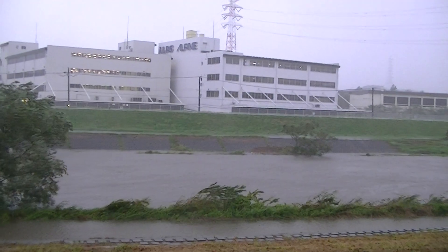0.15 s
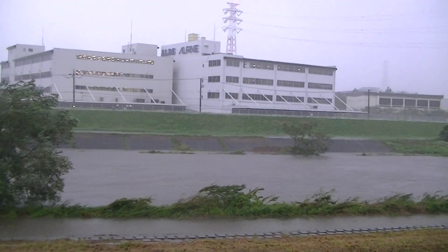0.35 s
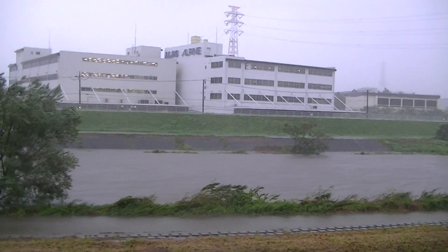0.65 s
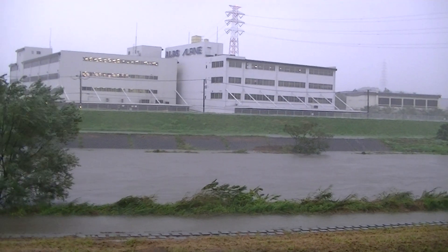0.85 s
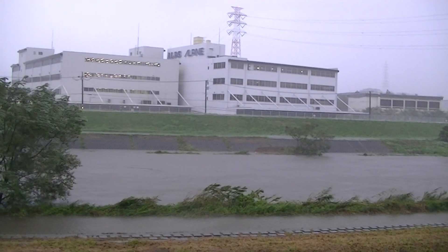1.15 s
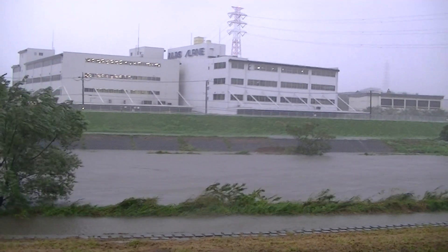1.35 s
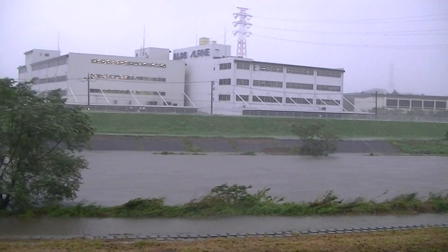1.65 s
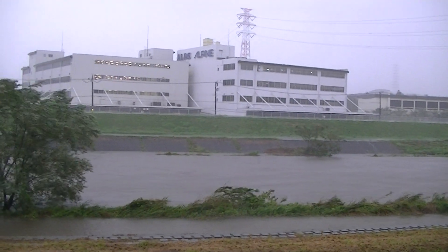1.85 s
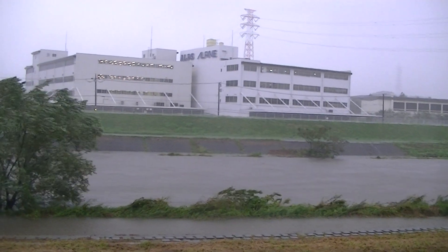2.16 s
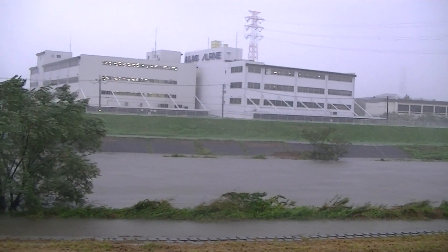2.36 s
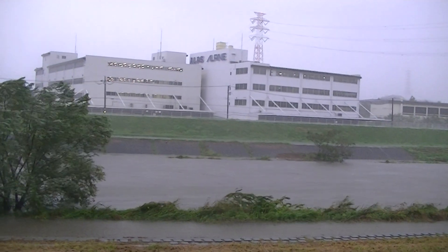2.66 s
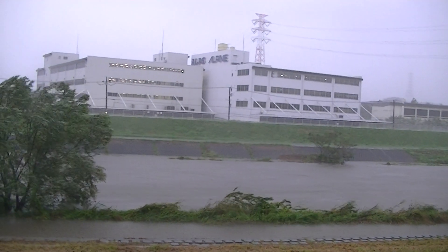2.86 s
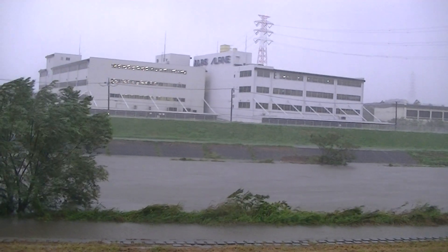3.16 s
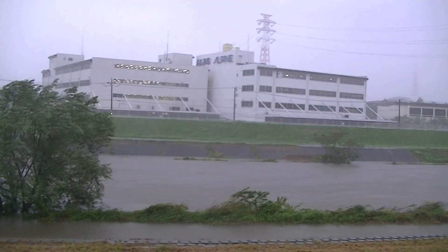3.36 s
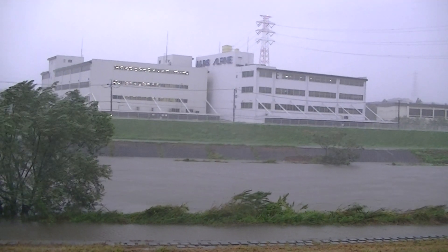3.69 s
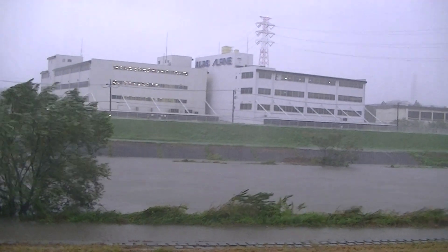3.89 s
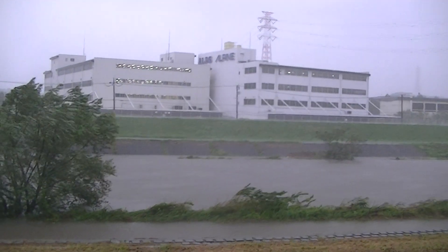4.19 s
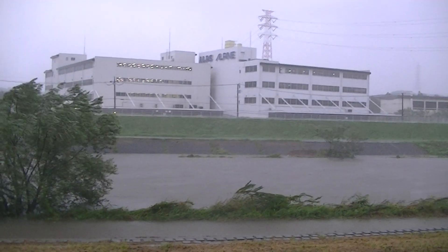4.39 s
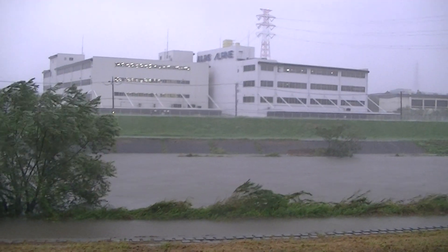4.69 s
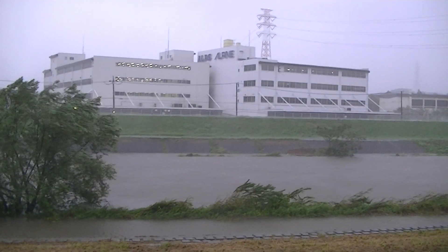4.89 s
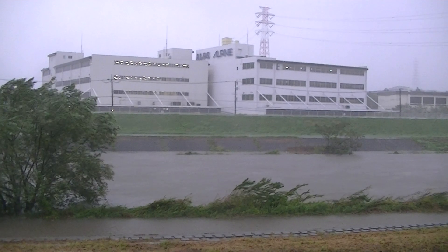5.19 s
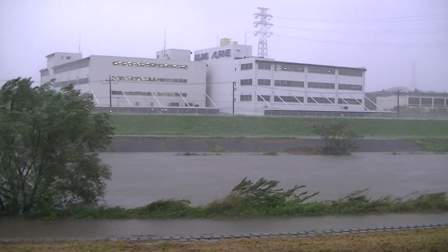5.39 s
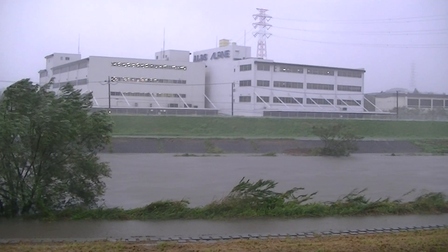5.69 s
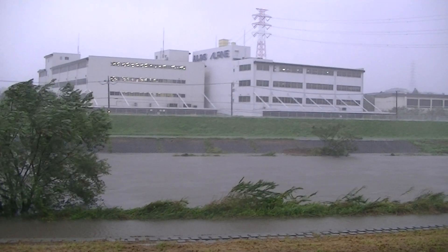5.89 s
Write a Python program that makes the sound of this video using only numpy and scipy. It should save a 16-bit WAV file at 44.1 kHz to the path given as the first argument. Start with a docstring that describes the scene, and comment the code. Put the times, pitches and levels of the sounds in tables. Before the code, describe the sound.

Heard from a parked car, heavy rain hisses and gusts roar through leaves while a wiper knocks dully and nearby drops crackle.

```python
"""Gusts rush through the trees in a storm on a swollen river bank, heard from a parked car.
The trees and the heavy rain are noise in bands that flicker; close spray is made of tiny ringing grains.
The wiper thuds at each turn: a random push sets panel and cabin air ringing. Near drops tick as noise bursts.
Eddies at the microphone ports pop as short rings, over a lumpy rumble of low noise.
The microphones cut the bass steeply, the left one a little more than the right."""
import sys
import numpy as np
from scipy import signal
from scipy.io import wavfile

SR = 44100
rng = np.random.default_rng(int(sys.argv[2]) if len(sys.argv) > 2 else 0)


def store_pcm(level_fs):
    """Save levels as 16-bit WAV."""
    pcm = np.round(np.clip(level_fs, -1, 1) * 32767).astype(np.int16)
    wavfile.write(sys.argv[1], SR, np.atleast_2d(pcm).T)


N = 266364   # length in samples


def from_db(db):
    """Turns decibels into a factor for the wave's height."""
    return 10 ** (np.asarray(db) / 20)


def rms_one(x):
    """Scales a sound to an average strength (rms) of 1."""
    return x / np.sqrt(np.mean(x ** 2) + 1e-20)


def in_time(rows):
    """Draws straight lines between the rows of a time table, giving each column a value per sample."""
    s, *columns = np.transpose(rows)
    return [np.interp(np.arange(N) / SR, s, column) for column in columns]


def at_hz(points, hz):
    """Reads a spectrum at a pitch, with straight lines between points on a log-frequency axis."""
    table_hz, table_db = np.transpose(points)
    return np.interp(np.log(hz), np.log(table_hz), table_db)


def drift(rate_hz):
    """Slow random wandering of spread 1: noise smoothed by two equal one-pole low-pass filters."""
    step = 40   # samples between random values; straight lines fill the gaps
    r = np.exp(-2 * np.pi * rate_hz * step / SR)
    noise = rng.standard_normal(N // step + 2002)
    slow = signal.lfilter([1], [1, -2 * r, r * r], noise)[2000:]   # skip the filter's start
    return np.interp(np.arange(N) / step, np.arange(len(slow)), rms_one(slow))


def ring(clicks, hz, t60_s):
    """A resonance: each click starts a sine wave that fades by 60 dB in t60_s."""
    r = from_db(-60 / (t60_s * SR))
    w = 2 * np.pi * hz / SR
    return signal.lfilter([0, np.sin(w)], [1, -2 * r * np.cos(w), r * r], clicks + 1e-18)


def add(out, s, db, shape):
    """Adds a short sound at time s, scaled so that its peak has the given level."""
    i = round(s * SR)
    out[i:i + len(shape)] += from_db(db) * shape[:N - i] / np.abs(shape).max()


def banded_noise(spectrum, tilt_db, shared_db, own_db, flutter_hz):
    """Third-octave bands of stereo noise flicker partly together and partly alone."""
    # how wide the stereo is, side against middle: f/Hz, level/dB
    stereo_spread = [(60, -5), (150, -21), (400, -16), (1000, -21.5), (2400, -16), (4500, -15.5),
                     (8000, -21.5), (15000, -35)]
    out = 0
    together = drift(flutter_hz)
    edges = 70 * 2 ** (np.arange(25) / 3)
    white = rng.standard_normal((2, 2, N))   # neighbouring bands get unrelated noise
    for k, (low, high) in enumerate(zip(edges, edges[1:])):
        band = signal.butter(2, [low, high], "band", fs=SR, output="sos")
        mid, side = signal.sosfilt(band, white[k % 2])
        hz = np.sqrt(low * high)
        tilt = tilt_db * np.log2(hz / 1200)   # tilt_db is per octave
        flicker = shared_db * together + own_db * drift(16.0)
        gain = from_db(at_hz(spectrum, hz) + tilt + flicker)
        side = from_db(at_hz(stereo_spread, hz)) * side
        out = out + gain * (mid + side * [[1], [-1]])
    return rms_one(out)


def wind():
    """Gusts rise and fall along straight dB slopes and add power; brightness is averaged by power."""
    # steady wind in the trees: t/s, level/dB
    steady_wind = [(0, -35), (.3, -35.5), (1.1, -33), (1.4, -35), (2.2, -33), (2.5, -35), (4.7, -36),
                   (5.47, -36.5), (5.72, -32.5), (6.04, -34.5)]
    # gusts on top: peak t/s, peak level/dB, rise/(dB per s), fall/(dB per s), brightness/(dB per octave)
    gusts = [(1.87, -35, 25, 80, -.8), (2.6, -28, 150, 35, .9), (2.725, -24.3, 75, 65, 2.6),
             (2.84, -27.5, 150, 55, 1.8), (3.06, -29, 200, 40, 1), (3.125, -27, 70, 65, .2),
             (3.6, -25.3, 20, 60, 1.0), (3.98, -28, 15, 28, .8), (4.27, -29.5, 300, 25, 1.2),
             (4.4, -31, 30, 45, .6), (4.812, -30.5, 400, 50, 1.3), (4.88, -36, 100, 40, 2.5),
             (5.065, -31, 120, 30, .7)]
    steady_bright_db = 0.05   # dB per octave
    dulling = 4.5   # brightness lost after the peak, dB per octave each second
    power = from_db(2 * in_time(steady_wind)[0])   # doubled dB: power instead of height
    bright = steady_bright_db * power
    for s, db, rise_db, fall_db, bright_db in gusts:
        after = np.arange(N) / SR - s
        gust = from_db(2 * (db + np.minimum(rise_db * after, -fall_db * after)))
        power = power + gust
        bright = bright + gust * (bright_db - dulling * np.maximum(after, 0))
    return 10 * np.log10(power), bright / power


def trees():
    """Leaves and branches rush: banded noise takes its level and brightness from the wind."""
    # sound of the rush, strength per Hz: f/Hz, level/dB
    rush_spectrum = [(40, -1), (120, -18), (300, -2.5), (600, 2), (1000, 0.5), (1800, -2), (3000, -8),
                     (4500, -11), (7000, -24), (11000, -30.5), (16000, -42)]
    rush_db, bright_db = wind()
    rush = banded_noise(rush_spectrum, bright_db, shared_db=0.67, own_db=1.03, flutter_hz=39.0)
    return from_db(rush_db + 2) * rush


def rain():
    """Far drops merge into hiss; near spray stays grainy, each grain ringing a few cycles."""
    # strength of the rain: t/s, hiss level/dB, spray grains/(per s, before clumping)
    rain_strength = [(0, -40.5, 280), (.9, -37.5, 190), (2.5, -40.5, 260), (2.72, -43, 300),
                     (3.2, -42.5, 300), (4.2, -37, 390), (4.5, -37.5, 540), (5.1, -39, 280),
                     (6.04, -38.5, 450)]
    # sound of the hiss, strength per Hz: f/Hz, level/dB
    hiss_spectrum = [(100, 3), (800, 1), (2000, -0.5), (4000, -4.5), (6000, -5.5), (9000, -6.5),
                     (12000, -13), (14000, -5.5), (16000, -17)]
    hiss_db, grains_per_s = in_time(rain_strength)
    hiss = banded_noise(hiss_spectrum, 0, shared_db=0.77, own_db=.5, flutter_hz=16.0)
    hiss = from_db(hiss_db) * hiss

    sizes = from_db(5.1 * np.minimum(rng.exponential(1, N), 4)) * rng.choice([-1, 1], N)
    clumping = from_db(3.5 * drift(25.0))
    born = rng.random(N) < grains_per_s * clumping / SR
    pitches_hz = np.geomspace(4000, 14500, 12)
    dealt = rng.integers(0, 12, N)   # which pitch a grain gets
    spray = sum(ring(sizes * born * (dealt == k), hz, 8.7 / hz) for k, hz in enumerate(pitches_hz))
    sway = from_db(0.45 * np.outer([1, -1], drift(40.0)))   # slightly left, slightly right
    return hiss + from_db(-44.5) * spray * sway


def rumble():
    """Eddies make a lumpy low rumble that follows the gusts, with its own lumps at each port."""
    lumps_db = 7.2 * np.array([drift(20.0), drift(13.0)])
    level = from_db(wind()[0] - 39.5 + lumps_db)
    low_noise = signal.lfilter(*signal.butter(2, 250, fs=SR), rng.standard_normal((2, N)))
    return level * rms_one(low_noise)


def knock(modes, contact_s):
    """A rubbery contact shudders briefly; the resonances build up and die, in new shares each time."""
    push = np.zeros(SR // 3)
    length = round(contact_s * SR)
    push[:length] = np.hanning(length) * rng.standard_normal(length)
    # the second, shorter ring softens the start
    return sum(from_db(db) * rms_one(ring(ring(push, hz, t60_s), hz, 8 / hz)) for hz, db, t60_s in modes)


def thuds():
    """The turning wiper knocks the panel; the cabin air booms a little later."""
    # panel resonances: f/Hz, level/dB, time to fade by 60 dB/s
    panel_modes = [(425, 0, .12), (330, -8, .06), (545, -10, .06), (640, -12, .05)]
    # cabin air resonances: f/Hz, level/dB, time to fade by 60 dB/s
    cabin_modes = [(192, 0, .16), (165, -3, .24), (130, -4, .32)]
    # panel knock at each turn, top and bottom by turns: level/dB
    knock_levels = [-28, -30, -44, -36, -34, -36, -46, -28]
    # cabin boom at the top turn, then at the bottom turn: level/dB
    boom_levels = -56, -45
    first_turn_s, sweep_s, cycle_s = .392, .797, 1.396   # first top turn, top to bottom, top to top
    boom_lag_s = .01
    out = np.zeros(N)
    for k, panel_db in enumerate(knock_levels):
        cycle, bottom = divmod(k, 2)
        s = first_turn_s + cycle * cycle_s + bottom * sweep_s
        add(out, s, panel_db, np.diff(knock(panel_modes, .01)))   # differences thin the bass
        add(out, s + boom_lag_s, boom_levels[bottom], knock(cabin_modes, .015))
    return out


def pops():
    """An eddy pushes one microphone port for a cycle or two and the pressure leaks away."""
    # eddies: t/s, port (0 left, 1 right), peak level/dB, f/Hz
    eddies = [(1.538, 0, -39, 300), (1.545, 1, -38, 320), (3.024, 1, -36, 280), (4.220, 1, -38, 260),
              (4.765, 0, -28, 330), (4.770, 1, -23, 350), (4.782, 1, -30, 340), (4.817, 1, -39, 350),
              (5.0145, 1, -20, 850), (5.087, 1, -40, 190), (5.101, 1, -40, 200)]
    out = np.zeros((2, N))
    click = np.eye(1, 2000)[0]
    for s, port, db, hz in eddies:
        push = ring(ring(click, hz, 4.0 / hz), hz, 3.0 / hz)
        add(out[round(port)], s, db, np.diff(push))
    return out


def ticks():
    """Each near drop is a sharp crack: a fading noise burst through a bright band filter."""
    # drops close by: t/s, peak level/dB before the bass and treble cuts, f/Hz
    near_drops = [(2.3869, -34, 8000), (2.6777, -29, 8500), (4.2985, -29, 10500), (4.4047, -19.5, 10000),
                  (4.4189, -29, 10500), (4.4686, -24.5, 9500), (4.4791, -28, 11500), (4.51, -31, 10500),
                  (4.5885, -25, 8000), (4.6851, -25, 8000), (5.1232, -32, 8500), (5.1676, -32, 8500),
                  (5.238, -23, 9000), (5.5397, -32, 8000)]
    out = np.zeros(N)
    for s, db, hz in near_drops:
        burst = rng.standard_normal(200) * np.exp(-np.arange(200) / (0.0011 * SR))
        band_hz = [0.84 * hz, min(1.43 * hz, 17000)]
        crack = signal.lfilter(*signal.butter(2, band_hz, "band", fs=SR), burst)
        add(out, s, db, crack)
    return out


def scene():
    """Distance and the wind filter thin the storm's bass; the knocks come through the recorder's body."""
    thin = signal.butter(2, 529, "high", fs=SR, output="sos")   # cut below 529 Hz
    storm = signal.sosfilt(thin, trees() + rain() + ticks())
    return storm + rumble() + thuds() + pops()


def record(dry):
    """Steep bass cut, the left capsule losing more and leading in phase; faint noise; treble cut."""
    left_cut_hz, bass_cut_hz, treble_cut_hz, top_cut_hz = 94, 158, 11600, 15780
    left = from_db(-0.4) * signal.lfilter(*signal.butter(1, left_cut_hz, "high", fs=SR), dry[0])
    bass_cut = signal.butter(4, bass_cut_hz, "high", fs=SR, output="sos")
    both = signal.sosfilt(bass_cut, [left, dry[1]])
    self_noise = signal.lfilter([.05], [1, -.99], rng.standard_normal((2, N)))   # mostly bass
    both += from_db(-75) * self_noise
    both = signal.lfilter(*signal.butter(2, treble_cut_hz, fs=SR), both)   # the treble droops
    top_cut = signal.ellip(12, .5, 60, top_cut_hz, fs=SR, output="sos")   # very steep
    return signal.sosfilt(top_cut, both)


dry = scene()
out = record(dry)
store_pcm(out)
```